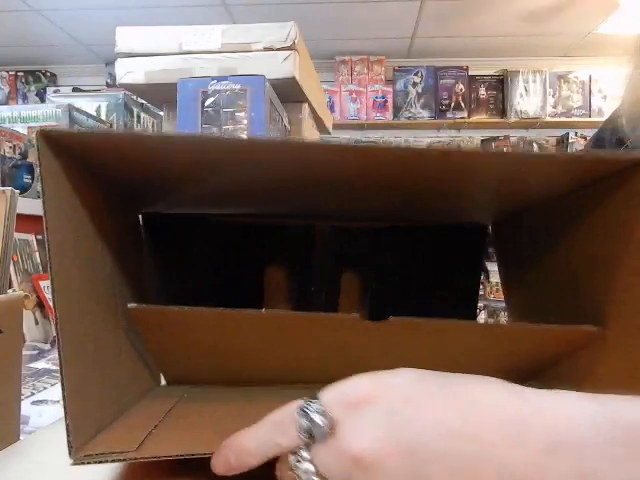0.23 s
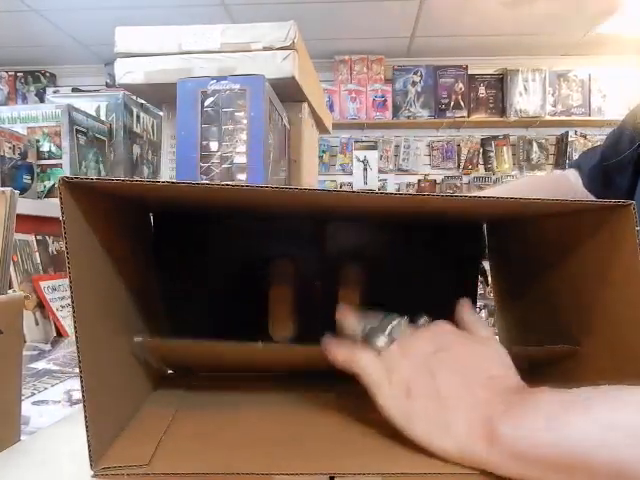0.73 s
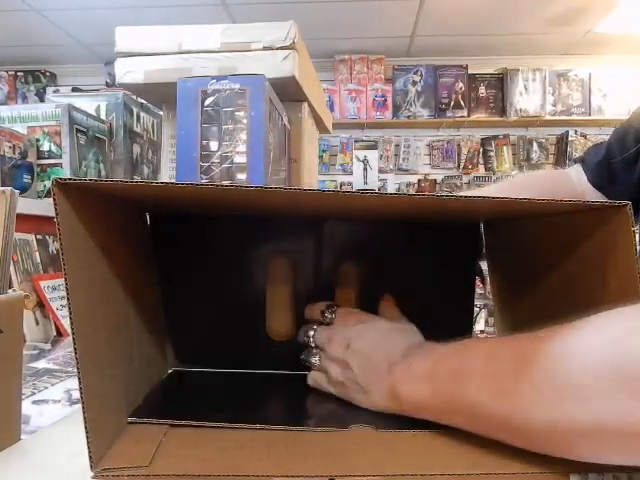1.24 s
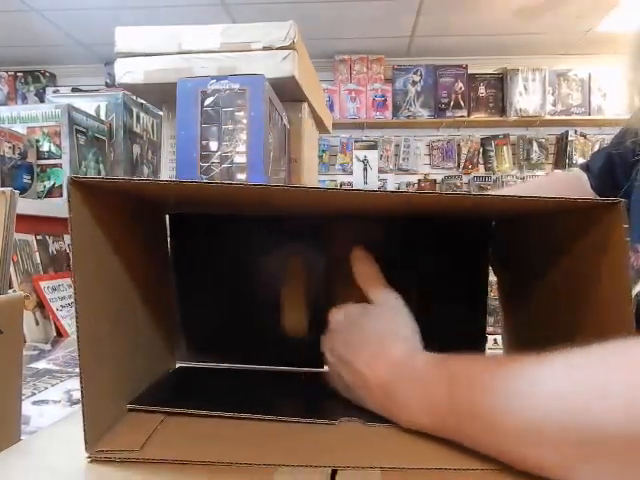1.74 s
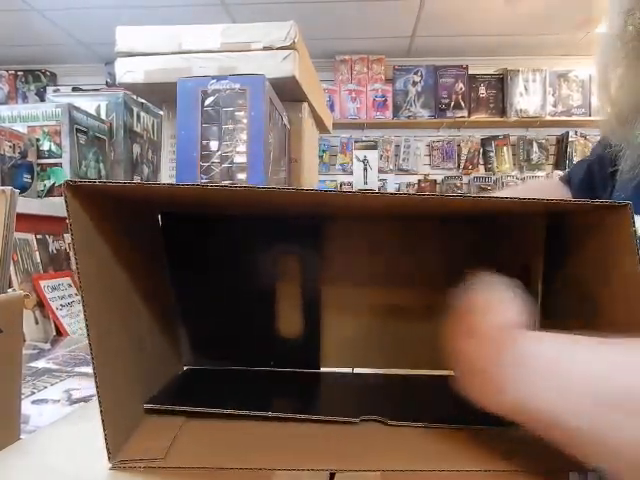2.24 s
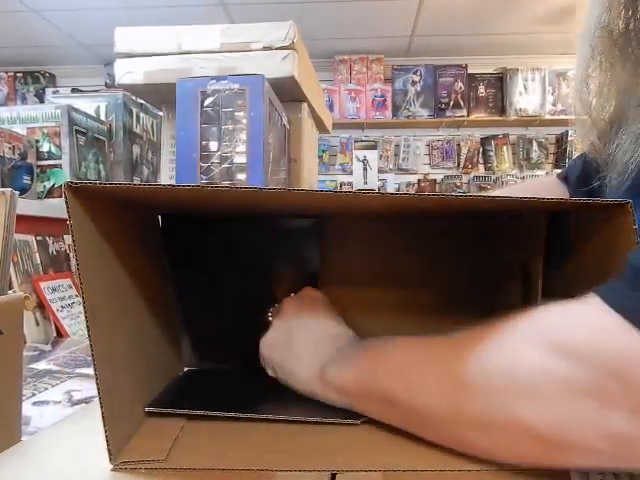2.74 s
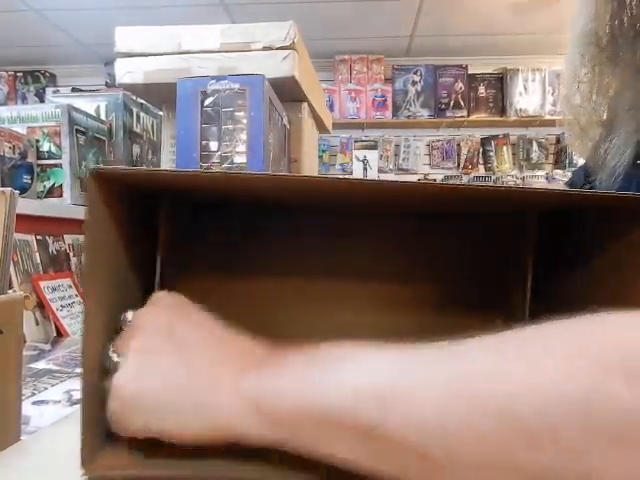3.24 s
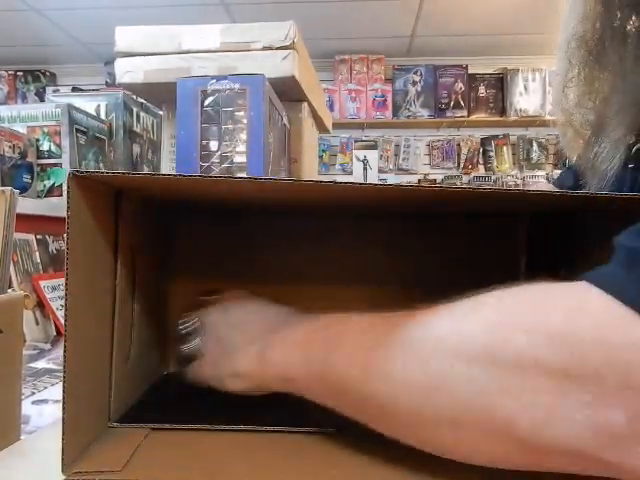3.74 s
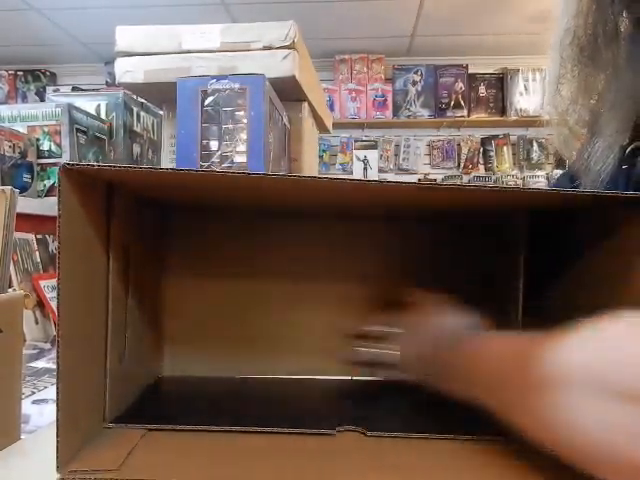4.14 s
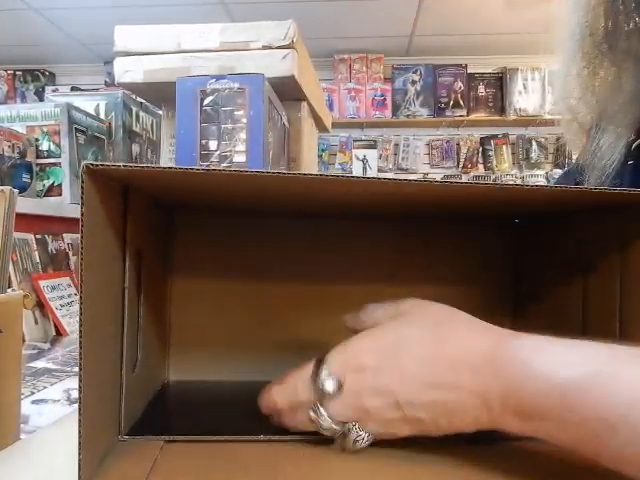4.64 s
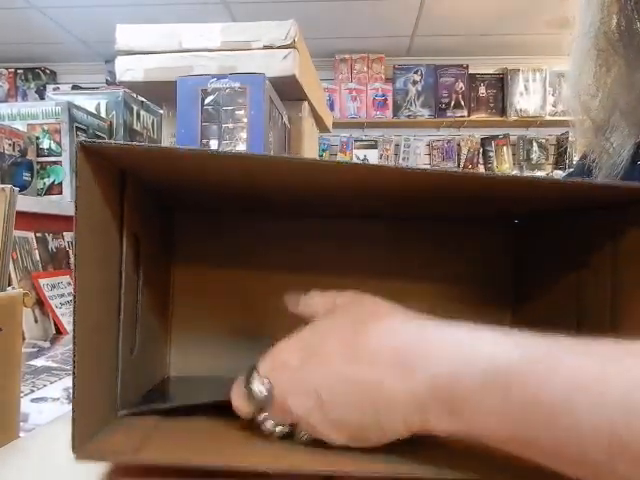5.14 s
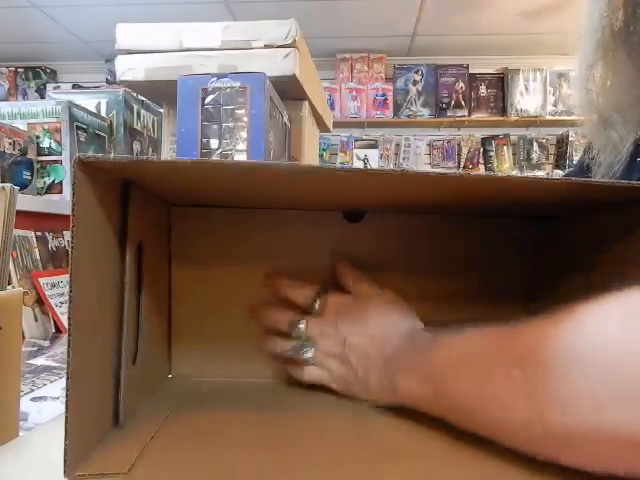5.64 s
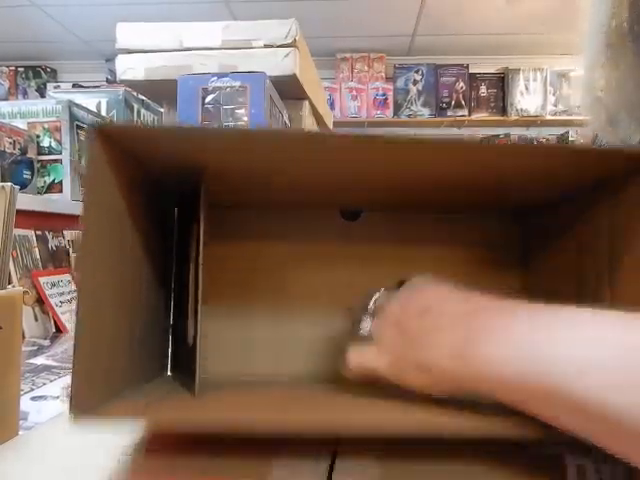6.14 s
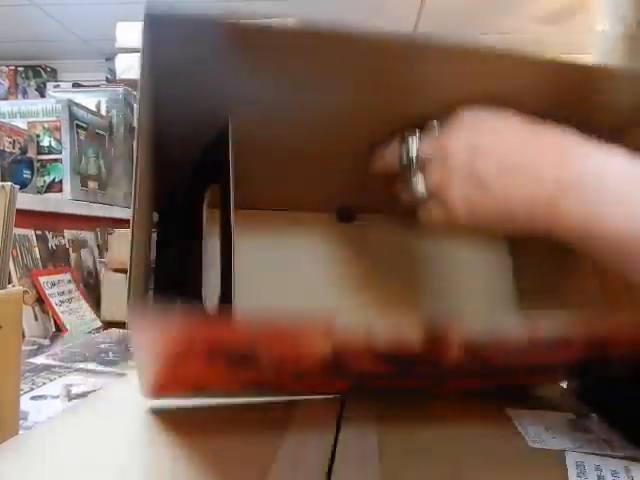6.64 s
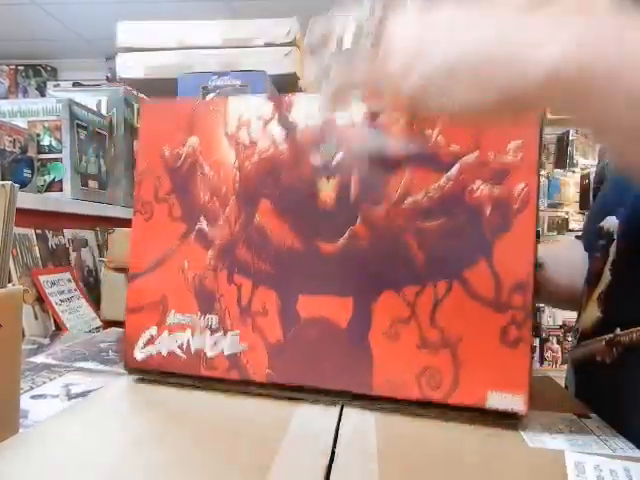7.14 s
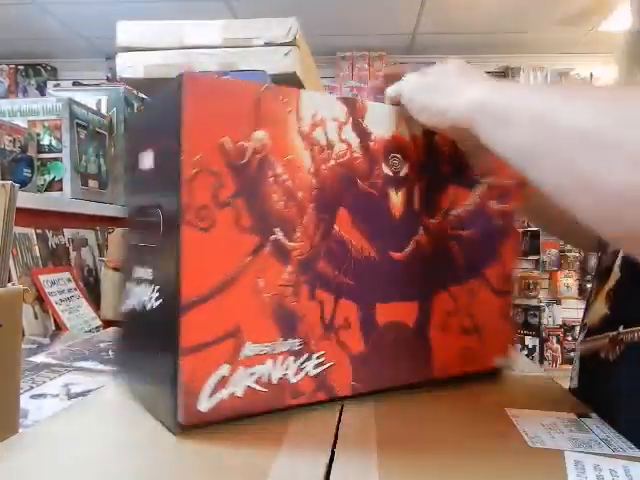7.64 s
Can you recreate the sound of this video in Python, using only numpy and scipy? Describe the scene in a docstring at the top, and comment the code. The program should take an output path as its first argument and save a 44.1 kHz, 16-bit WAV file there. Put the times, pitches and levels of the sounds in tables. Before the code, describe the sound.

Hands fold stiff cardboard flaps inside a hollow box, scraping, rasping and knocking irregularly, with small finger-ring ticks and one loud late thump.

```python
"""In a cluttered, dry room, hands fold a stiff corrugated box on a counter, close to a small stereo microphone.
Flap edges drag along the walls: coloured noise makes fibres hiss and panels rasp, and resonators make the box rumble.
Edges snap free as short bursts of hiss and rasp; flaps and palms knock on the panels as decaying modes.
Finger rings tick as clusters of short tones, and a low hum of wavering noise stands behind."""
import sys
import numpy as np
from scipy import signal
from scipy.fft import rfft, irfft, next_fast_len
from scipy.io import wavfile

SR = 44100
rng = np.random.default_rng(int(sys.argv[2]) if len(sys.argv) > 2 else 0)


def pcm_store(signal):
    """Save signal as 16-bit PCM."""
    levels = np.round(np.clip(np.atleast_2d(signal), -1, 1) * 32767)
    wavfile.write(sys.argv[1], SR, levels.astype(np.int16).T)


N = 347949

# modes of box panels and cavity: mode_hz, level_db, t60_s (before damping by the hand or the knock)
BOX_MODES = [(111.7, -5, 0.14), (189, -7.5, 0.13), (235, -6.5, 0.092), (273.4, -1.5, 0.06),
             (326.5, 2.5, 0.028), (407.8, -7, 0.083), (529.5, -7.5, 0.035), (640.5, -4, 0.06),
             (861, -2.5, 0.032), (1104, -5, 0.017), (1787, -4, 0.019), (2285, -13, 0.018)]


def from_db(db):
    """Amplitude gain of a level in dB."""
    return 10 ** (np.asarray(db) / 20)


def rms_one(x):
    """Scale to rms 1."""
    return x / np.sqrt(np.mean(x ** 2) + 1e-20)


def colour(x, points):
    """Filter by a (Hz, dB) table, interpolated over log frequency."""
    size = next_fast_len(N + 4096)
    hz, db = np.transpose(points)
    bin_hz = np.arange(size // 2 + 1) * SR / size
    gain = from_db(np.interp(np.log(bin_hz + 1), np.log(hz), db))
    return irfft(rfft(x, size) * gain, size)[..., :N]


def drift(rate_hz):
    """Slow random signal of rms 1: noise through a two-pole low-pass."""
    step = 16   # computed at every 16th sample
    r = np.exp(-2 * np.pi * rate_hz * step / SR)
    noise = rng.standard_normal((N + SR) // step)
    slow = signal.lfilter([1], [1, -2 * r, r * r], noise)[-N // step - 2:]
    return np.interp(np.arange(N) / step, np.arange(len(slow)), rms_one(slow))


def grit(uneven_db, clumps_db):
    """Fibres catch and slip: a click on every sample, of uneven size, under a level that clumps them."""
    click_db = uneven_db * np.minimum(rng.exponential(1, N), 6)
    return from_db(click_db + clumps_db) * rng.standard_normal(N)


def add(out, start_s, sound):
    """Mix a sound in at its start time."""
    at = round(start_s * SR)
    out[at:at + len(sound)] += sound[:N - at]


def dragging():
    """The grit of the stroke is heard directly, through the panel, and in the modes of the box."""
    hiss_gain, rasp_gain, rumble_gain, panel_hz, bright_db = strokes()
    judder_db = drift(40)   # the edge hops over the flutes; all layers feel it
    rough = crackle() * from_db(judder_db)
    snap_fibres, snap_panel = snaps()
    hiss = (hiss_gain * rough + snap_fibres) * fibre_hiss(bright_db)
    rasp = (rasp_gain * rough + snap_panel) * panel_rasp(panel_hz)
    return hiss + rasp + rumble_gain * box_rumble(panel_hz, judder_db)


def strokes():
    """Each stroke grips, swells to its fastest point, ebbs and lets go; overlaps are weighted by power."""
    # strokes of a flap edge or palm along the card: start_s, length_s, fastest_share (of the length),
    # hiss_db (when fastest), swell_db (fastest above ends), rasp_db (against hiss), rumble_db,
    # panel_hz (pitch of the rubbed panel), bright_db_per_octave (of the hiss when fastest)
    stroke_table = [(0.0, 0.016, 0.64, -29.5, -3.5, -16.5, -34.5, 331, 0),
                    (0.084, 0.072, .9, -22.5, 17, -15.5, -30.5, 228.7, -3),
                    (0.177, 0.05, 0.29, -31, 9, -5.5, -47.5, 298, -6),
                    (0.241, 0.21, 0.79, -19.5, 24, -8, -23.5, 299, 0),
                    (0.39, 0.2, 0.13, -32, 1.5, -1, -35, 323, -2),
                    (0.651, 0.13, 0.38, -25, 10.5, -2, -22.5, 266.3, -2),
                    (0.781, 0.13, 0.52, -25, 16, -3, -24.5, 292.6, 1.5),
                    (1.014, 0.51, 0.52, -43, 15, -13, -39, 281, 0.5),
                    (1.395, 0.17, 0.34, -24, 13, 0.5, -24, 267.3, 1),
                    (1.651, 0.34, 0.7, -21, 11.5, -5.5, -34, 405, 1.5),
                    (2.035, 0.12, 1, -35.5, 1.5, 1.5, -27.5, 420, -2.5),
                    (2.133, 0.1, 0.6, -20, 2.5, -8.5, -30, 294, 1.5),
                    (2.563, 0.42, 0.19, -54.5, 11.5, -8.5, -54, 189, 0.5),
                    (2.866, 0.43, 0.21, -29.5, 13, -5, -43, 292, -2.5),
                    (3.072, 0.23, 0.5, -21.5, 9, -6.5, -40.5, 365.5, 0.5),
                    (3.69, 0.23, 0, -71.5, -1, -2.5, -67, 252, -1.5),
                    (4.037, 0.13, 0.97, -45, 16, -10, -45.5, 283, -3.5),
                    (4.197, 0.19, 0.84, -21.5, 21.5, -8, -24, 236.5, -1),
                    (4.377, 0.48, 0, -40, 14.5, -8.5, -45.5, 234, 2),
                    (4.91, 0.16, 0.93, -37, 6, -7, -36, 230.4, -7),
                    (5.105, 0.33, 0.38, -30, 19, 1, -31.5, 236.3, -2.5),
                    (5.251, 0.32, 0.45, -21.5, 9, -9, -34, 224, 1),
                    (5.606, 0.16, 0.1, -33.5, 11, 1, -46, 414, -3),
                    (5.903, 0.02, 1, -42.5, 7, -11, -32.5, 228, -1),
                    (5.945, 0.069, 0.48, -26.5, 17, -7.5, -29, 218, 0),
                    (6.025, 0.13, 0, -45.5, 4.5, -7, -37, 194, -3),
                    (6.329, 0.058, 0, -43.5, -4, -6, -47.5, 398, -7),
                    (6.469, 0.73, 0, -46.5, 12, -6.5, -37, 214, -2),
                    (6.756, 0.32, 0.72, -33.5, 17, -2.5, -30.5, 280, -2.5),
                    (7.005, 0.086, 1, -43, 7, -10, -31, 334, -8.5),
                    (7.165, 0.4, 0.097, -63.5, 21, -7, -52, 287, -4.5),
                    (7.471, 0.4, 0.69, -49, 8.5, -4, -41.5, 328.6, -4)]
    grip_db_per_s, let_go_db_per_s = 600, 400.5
    rumble_follows, rumble_dies_db_per_s = 0.49, 237.5   # follows the swell in part, rings on longer
    brightens = 0.097   # dB per octave lost for each dB below the fastest point

    t = np.arange(0, N + 64, 64) / SR
    columns = np.transpose(stroke_table)[:, :, None]
    start, length, fastest, hiss_db, swell_db, rasp_db, rumble_db, panel_hz, bright_db = columns
    along = np.clip((t - start) / length, 0, 1)
    fastest = np.clip(fastest, .01, .99)
    swell = -swell_db * np.maximum(1 - along / fastest, (along - fastest) / (1 - fastest))

    before_s = np.maximum(start - t, 0)
    after_s = np.maximum(t - start - length, 0)
    edge_db = hiss_db + swell - grip_db_per_s * before_s - let_go_db_per_s * after_s
    box_db = rumble_db + rumble_follows * swell - grip_db_per_s * before_s - rumble_dies_db_per_s * after_s
    edge_power = from_db(edge_db) ** 2 + 1e-30
    box_power = from_db(box_db) ** 2 + 1e-30

    hiss_gain = np.sqrt(edge_power.sum(axis=0))
    rasp_gain = np.sqrt((edge_power * from_db(rasp_db) ** 2).sum(axis=0))
    rumble_gain = np.sqrt(box_power.sum(axis=0))
    pitch_hz = (box_power * panel_hz).sum(axis=0) / box_power.sum(axis=0)
    bright = (edge_power * (bright_db + brightens * swell)).sum(axis=0) / edge_power.sum(axis=0)
    controls = hiss_gain, rasp_gain, rumble_gain, pitch_hz, bright
    return [np.interp(np.arange(N) / SR, t, c) for c in controls]


def crackle():
    """Single fibres and flutes give way under a stroke: gain 1 with brief random jumps."""
    rate_per_s, mean_jump_db, decay_s = 110, -6.5, 0.0032
    hits = rng.random(N) < rate_per_s / SR
    jumps = hits * from_db(mean_jump_db) * rng.exponential(1, N)
    return 1 + signal.lfilter([1], [1, -np.exp(-1 / (decay_s * SR))], jumps)


def snaps():
    """Edges catch and let go: fibre and panel gains with a sharp tick, then a short scuff that dies away."""
    # start_s, fibres_db, panel_db (scales of the tick and scuff), scuff_s (at least 0.003 is used)
    snap_table = [(0.019, -11.5, -32, 0.0038), (0.061, -20, -25.5, 0.074), (0.134, -27, -9, 0.024),
                  (0.897, -10, -22, 0.016), (0.928, -29, -26, 0.0073), (0.968, -35.5, -26.5, 0.012),
                  (1.063, -40, -39.5, 0.074), (1.194, -22.5, -39, 0.0036), (1.554, -31.5, -17.5, 0.0038),
                  (1.635, -52, -24.5, 0.017), (2.012, -12.5, -17, 0.012), (2.7744, -17.5, -30, 0.015),
                  (2.798, -23, -24.5, 0.013), (2.811, -16, -25.5, 0.011), (3.17, -15, -45, 0.015),
                  (3.196, -32.5, -30.5, 0.016), (3.292, -13.5, -16.5, 0.038), (3.637, -25, -19, 0.033),
                  (3.658, -19.5, -30.5, 0.017), (3.958, -24, -26, 0.047), (4.197, -36, -22, 0.024),
                  (4.342, -35, -16.5, 0.0058), (4.366, -26, -16, 0.0027), (4.801, -31.5, -40, 0.015),
                  (4.985, -45, -22.5, 0.013), (5.041, -18.5, -19.5, 0.022), (5.1, -31.5, -52, 0.0084),
                  (5.137, -21.5, -53, 0.0089), (5.322, -24, -10.5, 0.025), (5.605, -20, -44, 0.031),
                  (5.742, -10.5, -10, 0.0047), (5.752, -12.5, -15.5, 0.013), (5.941, -17, -14, 0.017),
                  (6.015, -23, -37, 0.0042), (6.119, -39, -41, 0.034), (6.2147, -20.5, -27.5, 0.021),
                  (6.376, -17, -21, 0.014), (6.474, -38, -32.5, 0.03), (6.589, -32.5, -35, 0.037),
                  (6.923, -23, -35, 0.024), (7.01, -17.5, -16, 0.01), (7.081, -19, -12, 0.017),
                  (7.156, -30, -22, 0.017), (7.292, -50, -47, 0.033), (7.496, -42.5, -33.5, 0.015),
                  (7.568, -34.5, -32, 0.022), (7.735, -37.5, -43, 0.01)]
    fibres, panel, t = np.zeros(N), np.zeros(N), np.arange(SR // 6) / SR
    tick = from_db(-60 * t / .014)
    rise = 1 - np.exp(-t / .0015)
    for start_s, fibres_db, panel_db, scuff_s in snap_table:
        scuff = 0.33 * np.exp(-(t / max(scuff_s, .003)) ** 2.65)
        shape = (tick + scuff) * rise
        add(fibres, start_s, from_db(fibres_db) * shape)
        add(panel, start_s, from_db(panel_db) * shape)
    return fibres, panel


def fibre_hiss(bright_db):
    """Coloured grit in fifth-octave bands that swell and fade on their own, tilted by the brightness."""
    # hiss spectrum: freq_hz, density_db (relative)
    fibre_spectrum = [(1760, -23.5), (3000, -8), (4050, 0.5), (8400, 0.5), (12500, -5), (15100, -11.5)]
    patchy_db = 3
    fibres = [rms_one(colour(grit(0.87, 0.77 * drift(48)), fibre_spectrum)) for _ in range(2)]
    edges_hz = 1500 * 2 ** (np.arange(19) / 5)
    hiss = 0
    for k, (low, high) in enumerate(zip(edges_hz, edges_hz[1:])):
        sos = signal.butter(2, [low, high], "band", fs=SR, output="sos")
        band = signal.sosfilt(sos, fibres[k % 2])   # neighbouring bands use separate grit
        band_db = bright_db * np.log2(low / 6000) + patchy_db * drift(12)
        hiss = hiss + from_db(band_db) * band
    return hiss


def panel_rasp(panel_hz):
    """Coarse grit through the hollow box, with its upper modes singing through, under a slow waver."""
    # rasp spectrum: freq_hz, density_db (relative)
    rasp_spectrum = [(350, -2), (800, -2.5), (1110, -9), (1360, -11.5), (1690, -3.5), (2590, -3.5),
                     (3200, -11), (4600, -49.5)]
    walls_db = -8.0
    waver = from_db(1.8 * drift(10))
    scratch = grit(2.2, 1.23 * drift(43))
    walls = 0
    for hz, _, t60 in BOX_MODES[-4:]:
        mode = signal.lfilter(*signal.iirpeak(hz, hz * t60 / 4, SR), scratch)
        walls = walls + rms_one(mode) * from_db(2 * drift(8))
    feedback = 0.33 * (panel_hz / 400) ** 2   # clearer for high-pitched panels
    panel = rms_one(colour(hollow(scratch, panel_hz, feedback), rasp_spectrum))
    return waver * rms_one(panel + from_db(walls_db) * walls / 2)


def hollow(x, spacing_hz, feedback):
    """Sound bounces between two facing walls: delayed copies give peaks at multiples of the panel's pitch."""
    at = np.arange(N)
    feedback = np.clip(feedback, 0, .9)
    return sum(feedback ** k * np.interp(at - k * SR / spacing_hz, at, x) for k in range(5))


def box_rumble(panel_hz, judder_db):
    """Slips drive two-pole modes, strongest near the rubbed panel's pitch, and that pitch and its octave."""
    reach_db = 1.5   # loss per squared octave between a mode and the panel's pitch
    width_hz, octave_db = 40, -5
    slips = rms_one(grit(3.5, 3.0 * judder_db + 2.0 * drift(15)))
    modes, power = 0, 0
    for k, (hz, level_db, t60) in enumerate(BOX_MODES):
        r = from_db(-60 / (.5 * t60 * SR))   # the touching hand halves the ringing
        w = 2 * np.pi * hz / SR
        share = from_db(level_db - reach_db * np.log2(hz / panel_hz) ** 2)
        mode = rms_one(signal.lfilter([0, 1], [1, -2 * r * np.cos(w), r * r], slips))
        modes = modes + (-1) ** k * share * mode
        power = power + share ** 2

    # shift to 0 Hz, low-pass and shift back: a narrow band that follows the moving pitch
    turn = np.exp(2j * np.pi * np.cumsum(panel_hz) / SR)
    low_pass = signal.butter(2, width_hz, fs=SR, output="sos")
    own, octave = [rms_one(np.real(p * signal.sosfilt(low_pass, slips / p))) for p in (turn, turn ** 2)]
    octave_gain = from_db(octave_db) * (panel_hz / 400) ** 2
    return (modes / np.sqrt(power) + own + octave_gain * octave) / np.sqrt(2)


def knocks():
    """A blow and weaker contacts close behind strike all modes, most those near the panel's pitch."""
    # knocks on the box: start_s, peak_db, panel_hz (pitch of the panel hit), ring_share (scales t60)
    knock_table = [(0.061, -16, 196, 0.98), (0.136, -14, 222, 1.9), (0.255, -15, 464, 0.84),
                   (0.579, -15, 209, 3), (0.675, -14, 302, 1), (0.829, -14.5, 345, 1.7),
                   (0.886, -19.5, 114, 2.5), (1.293, -27, 610, 0.3), (1.321, -25, 320, 0.37),
                   (1.42, -10.5, 279, 2.1), (1.553, -8, 308, 0.38), (1.662, -19.5, 257, 2),
                   (1.686, -22, 285, 2.2), (1.911, -14.5, 443.5, 3.5), (2.774, -17, 200, 1.07),
                   (2.812, -22, 245, 1.3), (3.312, -9, 289, 0.94), (3.637, -6.5, 218, 1.1),
                   (3.668, -18, 262, 1.26), (3.952, -10.5, 234, 1.8), (3.984, -9.5, 254, 1.05),
                   (4.119, -28.5, 200, 0.91), (4.192, -11, 298, 1.24), (4.344, -10, 228, 0.26),
                   (4.375, -14, 230, 0.38), (4.806, -20.5, 217, 1.4), (4.935, -19.5, 239, 1.4),
                   (4.988, -13, 233, 2.7), (5.329, -16, 220, 1.1), (5.518, -12.5, 255, 0.3),
                   (5.601, -17, 440, 1.4), (5.747, -12.5, 754, 1.13), (5.94, -3.5, 252, 0.47),
                   (6.217, -25.5, 150, 2), (6.378, -17.5, 413, 1.36), (6.483, -13, 240, 1.8),
                   (6.587, -16.5, 258, 1.6), (6.743, -28, 225, 0.74), (6.768, -22.5, 264, 0.43),
                   (6.974, -16, 354, 0.75), (7.082, 4, 384, 0.56), (7.1552, -9.5, 330, 0.98),
                   (7.301, -31.5, 352, 2.3), (7.332, -33, 336, 1.06), (7.459, -18.5, 124, 0.5),
                   (7.496, -22, 453, 1.55), (7.629, -15.5, 385, 1.03)]
    out, t = np.zeros(N), np.arange(SR // 4) / SR
    hz, level_db, t60 = np.repeat(np.transpose(BOX_MODES), 2, axis=1)[:, :, None]   # facing panels: pairs
    sign = (-1) ** np.arange(len(hz))[:, None]
    chance = rng.standard_normal((len(knock_table), 2, len(hz), 1))
    bounces = rng.random((len(knock_table), 2, 5))
    rise = 1 - np.exp(-t / .0003)
    for (start_s, peak_db, panel_hz, share), (strong, detune), (late, size) in zip(knock_table, chance, bounces):
        gains = sign * from_db(level_db + 2.5 * strong - 3.8 * np.log2(hz / panel_hz) ** 2)
        phase = 2 * np.pi * hz * (1 + 0.0797 * detune) * t
        modes = np.cos(phase) * from_db(-60 * t / (t60 * np.clip(share, .1, 3)))
        contacts = np.zeros(len(t))
        contacts[(late * .015 * SR).astype(int)] = .35 * (2 * size - 1)   # within 15 ms
        contacts[:8] = np.hanning(8) / 3
        body = signal.fftconvolve((gains * modes).sum(axis=0) * rise, contacts)[:len(t)]
        own = np.sin(2 * np.pi * panel_hz * t) * from_db(-60 * t / (0.068 * share))   # the panel's pitch
        body = body / np.abs(body).max() + 0.73 * own
        add(out, start_s, from_db(peak_db) * body / np.abs(body).max())
    return out


def rings():
    """Finger rings touch, small metal bands damped by the fingers: each mode is a cluster of short tones."""
    # ticks: start_s, level_db (scale of the tone cluster)
    tick_table = [(0.3052, -9), (1.317, -23.5), (1.5531, -6), (1.6063, -18), (2.359, -30.5), (3.884, -32.5),
                  (4.1074, -24), (4.149, -25), (4.4617, -26), (4.8135, -25), (5.0467, -11), (5.262, -7.5),
                  (5.831, -37), (6.119, -18.5), (6.135, -24), (6.378, -12), (6.807, -41)]
    # ring modes: mode_hz (centre of the cluster), level_db (relative)
    ring_modes = [(4050, 2), (5800, -8), (8100, -14)]
    t60_s, rise_s = 0.019, 0.00092
    out, t = np.zeros(N), np.arange(SR // 20) / SR
    hz, mode_db = np.repeat(np.transpose(ring_modes), 3, axis=1)[:, :, None]
    spread = rng.standard_normal((len(tick_table), len(hz), 1))
    envelope = from_db(-60 * t / t60_s) * (1 - np.exp(-t / rise_s))
    for (start_s, level_db), detune in zip(tick_table, spread):
        tones = from_db(mode_db) * np.sin(2 * np.pi * hz * (1 + .05 * detune) * t)
        cluster = tones.sum(axis=0) / 2
        add(out, start_s, from_db(level_db) * cluster * envelope)
    return out


def hum():
    """A low room hum: coloured noise whose level wavers."""
    # hum spectrum: freq_hz, density_db (relative)
    hum_spectrum = [(30, -16.5), (51, -8), (124, 8), (300, -28.5), (801, -27), (1430, -41.5), (2480, -32),
                    (3220, -64)]
    level_db = -54.5 + 3 * drift(6)
    return from_db(level_db) * rms_one(colour(rng.standard_normal(N), hum_spectrum))


def room(x, tail_db=-24, t60_s=0.27, dull_hz=6000):
    """The cluttered room adds a faint, dull tail of dying noise."""
    t = np.arange(SR // 2) / SR
    tail = rng.standard_normal(len(t)) * from_db(-60 * t / t60_s)
    tail = signal.sosfilt(signal.butter(1, dull_hz, fs=SR, output="sos"), tail)
    return x + from_db(tail_db) * signal.fftconvolve(x, tail / np.sqrt(np.sum(tail ** 2)))[:N]


def scene():
    """Near reflections differ at the two ports, mostly in the treble, and change as hands and box move."""
    # stereo spread: freq_hz, side_db (against mid)
    spread_spectrum = [(25, -5), (180, -24), (500, -19.5), (2000, -17), (8000, -9.5), (16000, -4.5)]
    mid = room(dragging() + knocks() + rings()) + hum()
    t = np.arange(SR // 25) / SR
    echoes = rng.standard_normal((3, len(t))) * from_db(-60 * t / 0.0085)
    moving = 0
    for echo in echoes:
        echo = echo / np.sqrt(3 * np.sum(echo ** 2))
        moving = moving + drift(10.4) * signal.fftconvolve(mid, echo)[:N]
    side = colour(moving, spread_spectrum)
    return np.array([from_db(4.5) * (mid + side), from_db(5.0) * (mid - side)])


def record(dry):
    """The small microphone loses the deep bass; peaks are rounded, the top is cut."""
    bass_cut_hz, treble_stop_hz = 42, 16250
    thin = signal.sosfilt(signal.butter(2, bass_cut_hz, "high", fs=SR, output="sos"), dry)
    rounded = 0.98 * np.tanh(thin / 1.481)
    return signal.sosfilt(signal.cheby2(14, 75, treble_stop_hz, fs=SR, output="sos"), rounded)


dry = scene()
out = record(dry)
pcm_store(out)
```